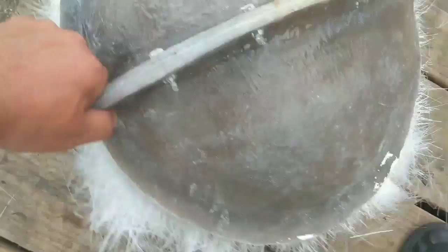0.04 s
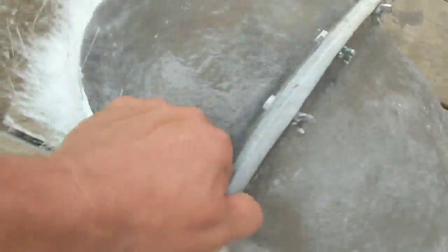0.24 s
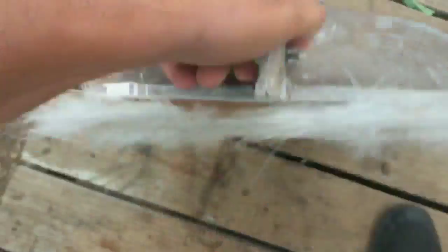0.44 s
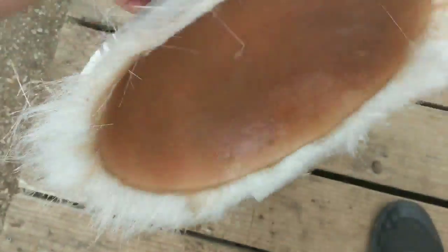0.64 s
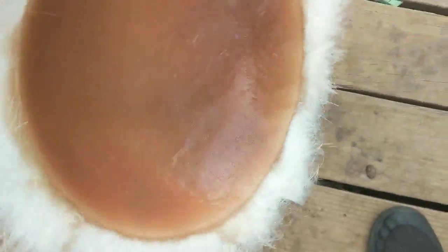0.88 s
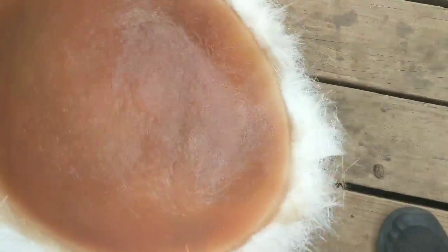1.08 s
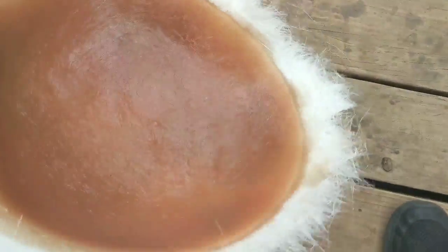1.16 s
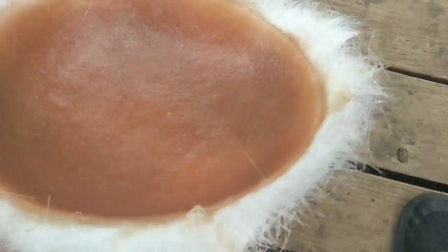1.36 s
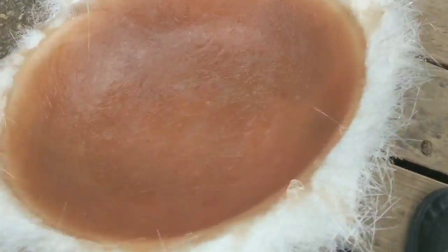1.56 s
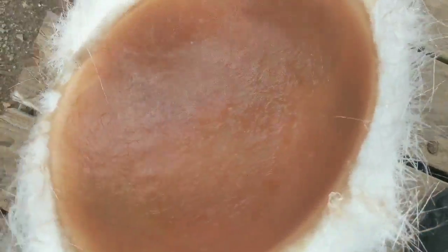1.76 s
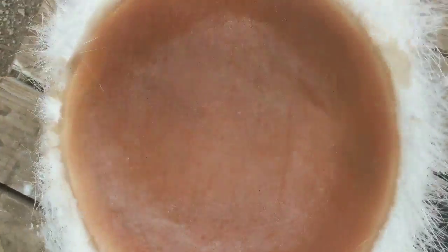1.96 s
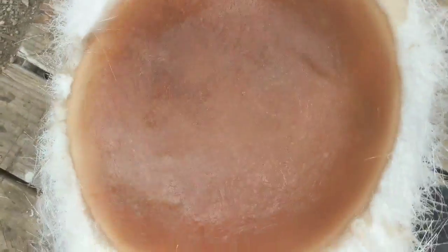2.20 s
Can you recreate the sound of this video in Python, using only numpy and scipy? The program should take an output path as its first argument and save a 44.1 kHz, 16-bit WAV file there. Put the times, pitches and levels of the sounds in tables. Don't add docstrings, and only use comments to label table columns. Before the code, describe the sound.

A stiff fibreglass bowl is handled close up on an outdoor wooden deck. Dry rustling and soft thuds open, with rubbing from 0.2 s and a hard, hollow crack near 0.37 s. More knocks land at 0.67-0.73 s. Quieter bumps and fibre brushing follow, with sharp ticks near 1.46 and 1.82-1.85 s, then clattering knocks from 1.95 to 2.2 s over faint outdoor hum.

```python
import sys
import numpy as np
from scipy import signal
from scipy.fft import rfft, irfft
from scipy.io import wavfile

SR = 44100
rng = np.random.default_rng(int(sys.argv[2]) if len(sys.argv) > 2 else 0)


def gain_from_db(level_db):
    decades = np.asarray(level_db, float) / 20
    return 10 ** decades


def wav_out(sig):
    wavfile.write(sys.argv[1], SR, np.round(np.clip(np.atleast_2d(sig).T, -1, 1) * 32767).astype(np.int16))


N = 98431

# start_s [s], shell_db [dB], deck_db [dB], crack_db [dB], crack_hz [Hz]
KNOCKS = [(0.250, -24.5, -10, -37, 1360), (.273, -29, -21, -35, 1290), (0.3687, -20, -12.5, 2.5, 1130),
          (0.6725, -16.5, -13.5, -7.5, 1060), (0.7325, -20, -18.5, -9, 1254),
          (1.4615, -23.5, -13.5, -24, 1310), (1.834, -25.5, -20, -20, 317),
          (1.9457, -16.5, -14.5, -12, 1077), (2.0125, -24.5, -43, -25, 1130), (2.043, -29, -19, -44, 1070),
          (2.175, -15, -15, -12, 800), (2.197, -49, -22, -53, 890)]
# pitch_hz [Hz], level_db [dB], t60_s [s]
SHELL = [(150, -6.5, 0.65), (244.4, 8.5, 0.039), (285.6, -7.5, 0.6), (334, -2, 0.34), (398.2, 0, 0.24),
         (451.4, -2.5, 0.31), (571.7, -1, 0.13), (682, -10.5, 0.14), (840, -8, 0.18), (1060, -10, 0.15),
         (1250, -19, 0.095)]
# pitch_hz [Hz], level_db [dB], t60_s [s]
DECK = [(58.5, -63, 0.12), (79, -17.5, 0.82), (90, -21.5, 0.82), (124.2, -13.5, 1), (178, -7.5, 0.45),
        (203.7, 1.5, 0.036), (240.4, -11.5, 0.36), (361, -20.5, 0.13), (567, -40, 0.072)]


def rms_one(x):
    return x / np.sqrt(np.mean(x ** 2) + 1e-20)


def in_time(rows):
    s, *columns = np.transpose(rows)
    return [np.interp(np.arange(N) / SR, s, column) for column in columns]


def at_hz(points, hz):
    point_hz, point_db = np.transpose(points)
    return np.interp(np.log(hz), np.log(point_hz), point_db)


def drift(rate):
    knots = rng.standard_normal(N // 100)
    return np.interp(np.arange(N) / SR * rate, np.arange(len(knots)), knots)


def ring(clicks, hz, t60):
    radius = gain_from_db(-60 / (t60 * SR))
    angle = 2 * np.pi * hz / SR
    poles = [1, -2 * radius * np.cos(angle), radius * radius]
    return signal.lfilter([0, np.sin(angle)], poles, clicks + 1e-18)


def band(x, hz, octaves, order=2):
    edges = np.clip(hz * 2 ** (octaves * np.array([-.5, .5])), 10, SR / 2.1)
    return signal.sosfilt(signal.butter(order, edges, "band", fs=SR, output="sos"), x)


def low(x, hz):
    return signal.sosfilt(signal.butter(2, hz, fs=SR, output="sos"), x)


def sine(hz, t):
    return np.sin(2 * np.pi * hz * t)


def fade(t60, size):
    return gain_from_db(-60 * np.arange(size) / SR / t60)


def add(out, s, x):
    i = int(s * SR)
    out[i:i + len(x)] += x[:N - i]


def grains(rate, spread_db):
    sizes = gain_from_db(spread_db * np.minimum(rng.exponential(1, N), 4)) * rng.choice([-1, 1], N)
    return sizes * (rng.random(N) < rate / SR)


def air():
    air_spectrum = [(15, -19), (25, 10.5), (80, 6), (212, -6.5), (427, -17), (840, -19.5), (1040, -26),
                    (7310, -39.5), (16000, -55)]
    hz = np.maximum(np.arange(N // 2 + 1) * SR / N, 1)
    noise = rfft(rng.standard_normal(N))
    return gain_from_db(-33.5) * rms_one(irfft(noise * gain_from_db(at_hz(air_spectrum, hz)), N))


def drag():
    drag_moves = [(0, -38.5, -58), (.17, -28.5, -46), (.26, -23.5, -39), (.355, -27.5, -42),
                  (.385, -59, -59.5), (.66, -60, -54.5), (.85, -49, -56.5), (1.7, -56, -59.5),
                  (1.8, -51.5, -44), (1.89, -37, -51.5), (2.23, -71, -61)]
    slips = low(grains(500, 1.2), 375)
    shell = sum(gain_from_db(db) * ring(slips, hz, t60 / 2) for hz, db, t60 in SHELL)
    deck = sum(gain_from_db(db) * ring(slips, hz, t60) for hz, db, t60 in DECK)
    grit = sum(ring(grains(300, 4.5), hz, 22 / hz) for hz in np.geomspace(750, 3000, 9))
    grit = grit * gain_from_db(3 * drift(60))
    weight_db, grit_db = in_time(drag_moves)
    rub = rms_one(shell) + gain_from_db(1.5) * rms_one(deck)
    return gain_from_db(weight_db) * rub + gain_from_db(grit_db) * rms_one(grit)


def brush():
    # peak_s [s], rise_s [s per 20 dB], fall_t60_s [s], level_db [dB]
    strokes = [(.0, .01, 0.025, -28.5), (.09, 0.3, 0.47, -43), (0.124, 0.066, 0.052, -38),
               (0.201, 0.068, 0.57, -40.5), (.3, 0.014, 0.6, -46.5), (0.686, 0.015, 0.17, -37),
               (.74, .01, 0.48, -50), (1.115, 0.022, 0.1, -51.5), (1.224, 0.018, 0.83, -46),
               (1.4, 0.027, 0.11, -43), (1.441, 0.058, 0.31, -36.5), (1.614, 0.028, 0.39, -40),
               (1.8, 0.044, 0.35, -40), (1.834, 0.031, 0.11, -40), (1.868, 0.023, 0.22, -41.5),
               (1.962, 0.067, 0.2, -37.5), (2.02, .01, 0.48, -51.5), (2.171, 0.069, 0.44, -44.5)]
    # pitch_hz [Hz], level_db [dB per Hz]
    fibre_spectrum = [(710, -37), (1200, 7.5), (1680, 5.5), (2000, -4), (3870, 3.5), (8170, 0),
                      (12900, -17), (16000, -12)]
    rest_db, fibres_per_s, spread_db, fibre_cycles, flicker_db = -63.5, 5300, 0.5, 11.4, -0.5
    t = np.arange(N) / SR
    power = gain_from_db(rest_db) ** 2
    for s, rise, fall, db in strokes:
        drop_db = np.where(t < s, 20 * (s - t) / rise, 60 * (t - s) / fall)
        power = power + gain_from_db(db - drop_db) ** 2

    clicks = grains(fibres_per_s, spread_db)
    dealt = rng.integers(0, 24, N)
    out = np.zeros(N)
    for k, hz in enumerate(np.geomspace(1300, 15500, 24)):
        gain = gain_from_db(at_hz(fibre_spectrum, hz) + 1.9 * drift(23.76)) * np.sqrt(hz)
        out += gain * rms_one(ring(clicks * (dealt == k), hz, fibre_cycles / hz))
    return np.sqrt(power) * gain_from_db(flicker_db * drift(99)) * rms_one(out)


def ticks():
    tick_events = [(0.0529, -19, 4860, 0.02), (0.182, -31, 7960, 0.02), (0.2503, -23, 3440, 0.032),
                   (0.272, -23.5, 2700, 0.035), (0.298, -26, 3150, 0.09), (0.609, -36, 4470, 0.025),
                   (1.181, -28, 1870, 0.091), (1.2113, -29, 4840, 0.11), (1.4382, -19, 6700, 0.063),
                   (1.4581, -8, 5300, 0.032), (1.534, -32, 4000, 0.016), (1.602, -26, 5100, 0.062),
                   (1.791, -39, 4000, 0.028), (1.8167, -7.5, 4100, 0.014), (1.8526, -8.5, 4270, 0.005),
                   (1.921, -30, 1100, 0.032), (1.946, -17.5, 5900, 0.029), (1.971, -20, 7140, 0.026),
                   (2.016, -24, 3570, 0.027), (2.174, -27, 6040, 0.046)]
    size = 5000
    out = np.zeros(N)
    for s, db, hz, t60 in tick_events:
        noise = rng.standard_normal((2, size))
        octaves = np.clip(.22 * (0.046 / t60) ** 2.1, .3, 1.5)
        crackle = rms_one(band(noise[0] * np.abs(noise[1]), hz, octaves, order=1)) * fade(t60, size)
        snap_t60 = np.minimum(.008 * 5000 / hz, t60)
        snap = rms_one(band(noise[1], hz, 1.8)) * fade(snap_t60, size)
        snap_gain = gain_from_db(4.) * min(1, hz / 4000) ** 3
        onset = 1 - fade(0.0051, size)
        add(out, s, gain_from_db(db - 7.5) * (crackle + snap_gain * snap) * onset)
    return out


def bumps():
    bump_events = [(0.067, -1.5, 147, 0.013), (0.076, -16.5, 85, 0.079), (.119, -7.5, 297, 0.043),
                   (0.229, -11, 245, 0.022), (0.706, -7, 103, 0.095), (0.765, -12, 95, 0.14),
                   (0.897, -13.5, 250, 0.029), (0.944, -20, 107, 0.061), (0.983, -10, 87, 0.044),
                   (1.013, -10.5, 154, 0.017), (1.169, -17, 240, 0.072), (1.182, -4, 62, 0.037),
                   (1.303, -5.5, 173, 0.018), (1.308, -11.5, 78, 0.09), (1.44, -16, 142, 0.048),
                   (1.492, -13, 100, 0.12), (1.534, -13, 67.2, 0.22), (1.646, -25, 114, 0.05),
                   (1.676, 2, 134, 0.012), (1.89, -24, 111, 0.078), (0.373, -19, 334, 0.4),
                   (1.535, -45.5, 957, 0.38), (1.4635, -16, 518, 0.063), (1.464, -15, 329, 0.11),
                   (1.835, -16.5, 175.5, 0.21), (1.176, -24.5, 438, 0.042), (1.307, -21.5, 303, 0.051),
                   (.775, -30.5, 518, 0.28), (2.177, -19.5, 1080, 0.049)]
    size = 12000
    out, t = np.zeros(N), np.arange(size) / SR
    for s, db, hz, t60 in bump_events:
        onset = 1 - np.exp(-3.5 * hz * t)
        add(out, s, gain_from_db(db) * sine(hz, t) * fade(t60, size) * onset)
    return out


def rings():
    ring_events = [(.203, -29.5, 1140, 0.073), (.21, -30.5, 1595, 0.17), (.248, -27, 1068, 0.13),
                   (0.252, -11.5, 323, 0.079), (0.271, -42, 1150, .08), (.272, -27.5, 895, 0.14),
                   (.275, -11, 331, 0.086), (.305, -38, 880, 0.047), (0.333, -21.5, 1265, .1),
                   (.333, -24, 690, .12), (.343, -12.5, 425, 0.12), (.368, 2.5, 203, 0.026),
                   (.374, -9.5, 446, 0.088), (0.384, -30.5, 1380, 0.18), (.6725, 0.5, 193, 0.058),
                   (.674, -15, 454, 0.16), (.682, -9.5, 328, 0.16), (.678, -21.5, 662, 0.25),
                   (.7335, -13, 472, 0.097), (.734, -14, 666, 0.041), (.741, -17, 319, 0.087),
                   (.768, -18, 193, 0.094), (.85, -25.5, 190.4, 0.27), (.785, -49, 2240, 0.23),
                   (1.436, -32, 1670, 0.018), (1.45714, -15, 2200, .003), (1.45918, -7, 2200, .003),
                   (1.46122, -6, 2200, .003), (1.471, -26, 2560, .025), (1.785, -36, 1500, .03),
                   (1.791, -23, 2980, 0.024), (1.798, -29, 1070, 0.033), (1.825, -29, 1090, 0.036),
                   (1.834, -16, 380, 0.02), (1.868, -29.5, 1720, 0.045), (1.947, -2.5, 468, 0.028),
                   (1.9477, -4.5, 205, 0.075), (1.958, -14, 390, 0.095), (1.951, -32, 1780, 0.045),
                   (0, -12.5, 260, 0.022), (1.968, -32, 722, 0.055), (2.013, -7.5, 420, 0.048),
                   (2.021, -3.5, 348, 0.037), (2.016, -11.5, 658, 0.032), (2.016, -31, 2340, 0.043),
                   (2.043, -27, 1045, 0.056), (2.177, -12, 266.3, 0.16), (2.177, -26, 438, 0.068),
                   (2.177, -7.5, 630, 0.045), (2.177, -16, 900, 0.059)]
    size = 9000
    out, t = np.zeros(N), np.arange(size) / SR
    for s, db, hz, t60 in ring_events:
        rough = np.clip(hz / 600 - 1, 0, .8) * (t60 * hz > 20)
        scrape = rms_one(band(rng.standard_normal(size), hz, .17, order=1))
        tone = np.sqrt(1 - rough) * sine(hz, t) + np.sqrt(rough / 2) * scrape
        swell = 1 - np.exp(-t / (.3 / hz + rough * .06 * t60))
        add(out, s, gain_from_db(db) * tone * fade(t60, size) * swell)
    return out


def body(modes, column):
    bend_spread, pair_split, strike_spread_db, lag_cycles = 0.018, 0.0498, 5.5, 0.25
    out, t = np.zeros(N), np.arange(16000) / SR
    hz, db, t60 = np.transpose(modes)[:, :, None]
    signs = (-1.) ** np.arange(len(modes))[:, None]
    late = np.maximum(t - lag_cycles / hz, 0)
    decay = gain_from_db(-60 * late / t60)
    for row in KNOCKS:
        luck = rng.standard_normal((5, len(modes), 1))
        pitch = hz * (1 + bend_spread * luck[0])
        cluster = 0
        for side in (-1, 0, 1):
            split = 1 + pair_split * side * (1 + 0.48 * luck[3 + side])
            cluster = cluster + sine(pitch * split, late) * (.6 if side else 1)
        gain = signs * gain_from_db(row[column] + db - 6.5 + strike_spread_db * luck[1])
        add(out, row[0], np.sum(gain * cluster * decay, axis=0))
    return out


def cracks():
    pulse_db, pulse_cycles, sweep_cycles = -0.5, 9.4, 1.22
    clack_t60_s, contact_s, edge_db = 0.019, 0.0015, -19
    size = 8000
    out, t = np.zeros(N), np.arange(size) / SR
    for s, shell_db, deck_db, db, hz in KNOCKS:
        noise = rng.standard_normal((2, size))
        sweep = np.sin(4 * np.pi * sweep_cycles * np.log1p(hz * t / sweep_cycles))
        pulse = gain_from_db(pulse_db) * sweep * fade(pulse_cycles / hz, size)
        edge = gain_from_db(edge_db) * rms_one(band(noise[1], 2200, 1.24, order=1))
        clack = sine(hz, t) + 0.45 * sine(1.233 * hz, t) + 0.14 * sine(1.6 * hz, t) + edge
        hit = (pulse + clack * fade(clack_t60_s, size)) * (1 - fade(contact_s, size))

        tail = np.zeros(size)
        for k in range(5):
            level_db = -5.5 * k - 12 * (k == 0)
            hiss = rms_one(band(noise[k % 2], 300 * 2 ** k, 0.78))
            tail += gain_from_db(level_db) * hiss * fade(0.22 * 2 ** (-0.85 * k), size)
        tail_gain = gain_from_db(shell_db - 9.5) + gain_from_db(db - 8.5)
        add(out, s, gain_from_db(db) * hit + tail_gain * tail * (1 - fade(0.0045, size)))
    return out


def scene():
    surroundings = air() + drag() + brush() + ticks()
    contacts = bumps() + rings() + cracks()
    knocks = body(SHELL, column=1) + body(DECK, column=2)
    return (surroundings + contacts + knocks)[None]


def low_pass(x):
    return signal.sosfilt(signal.butter(12, 16450, fs=SR, output="sos"), x)


def record(dry):
    ceiling = 1.03
    x = signal.sosfilt(signal.butter(4, 57., "high", fs=SR, output="sos"), dry)
    x = x / (1 + np.abs(x / ceiling) ** 6) ** (1 / 6)
    x = signal.sosfilt(signal.cheby2(12, 60, 16200, fs=SR, output="sos"), x)
    return low_pass(x)


dry = scene()
out = record(dry)
wav_out(out)
```